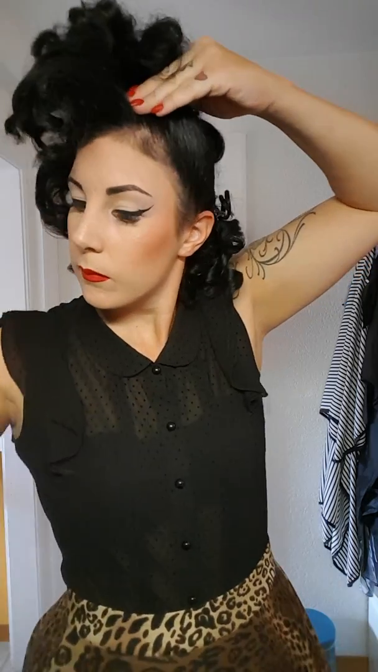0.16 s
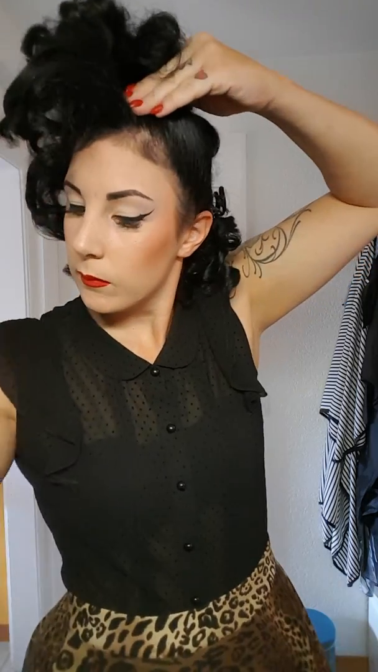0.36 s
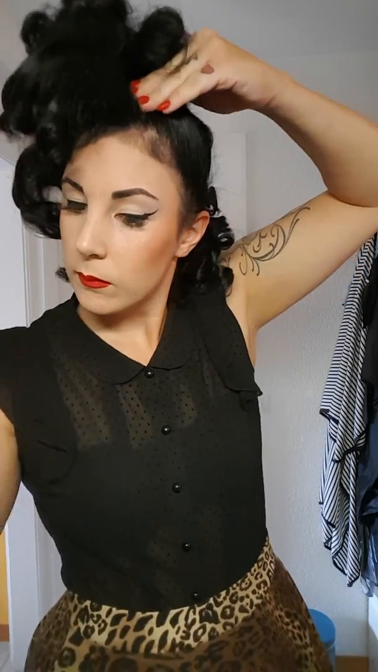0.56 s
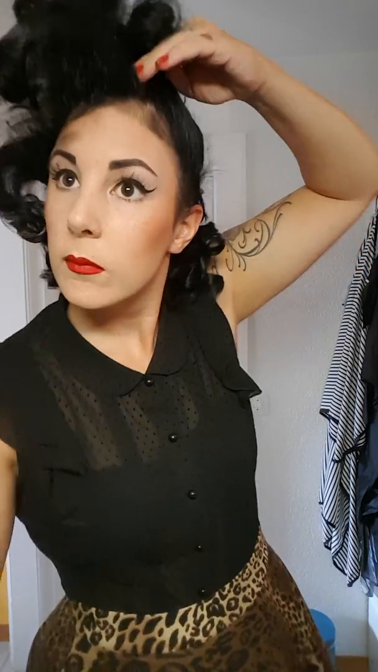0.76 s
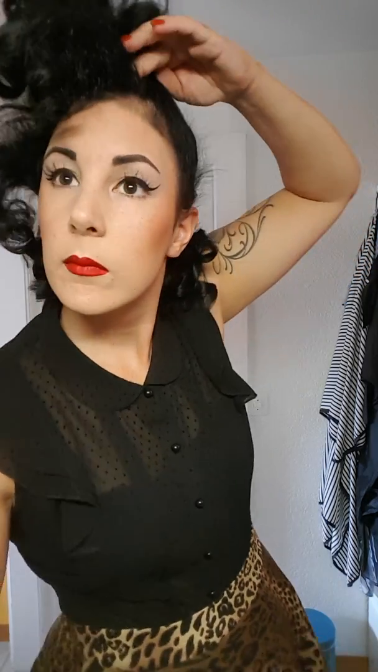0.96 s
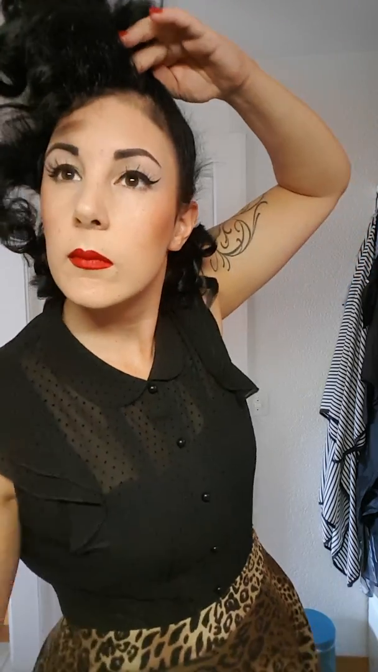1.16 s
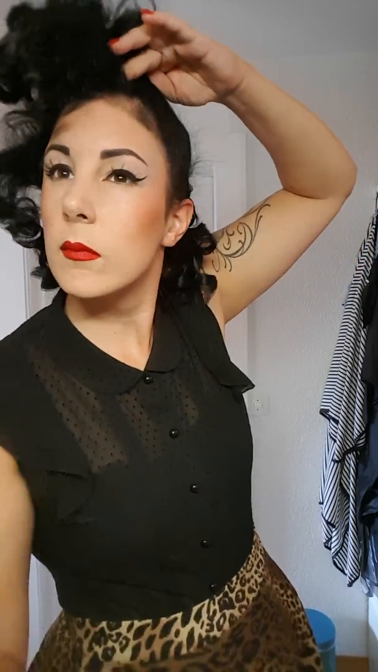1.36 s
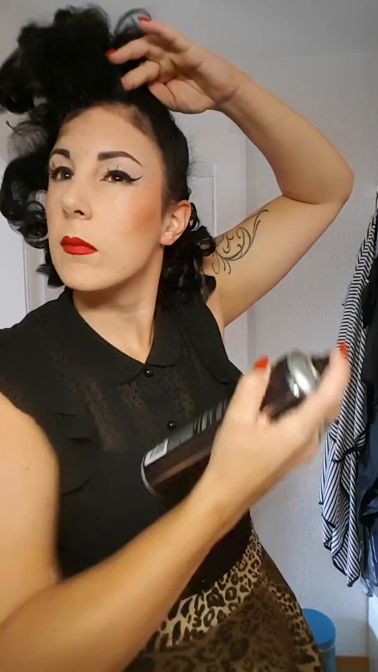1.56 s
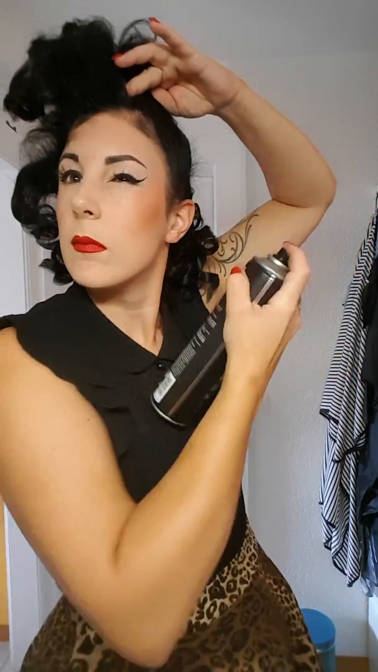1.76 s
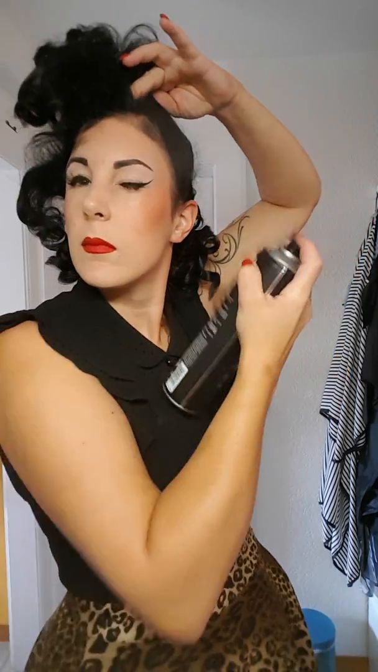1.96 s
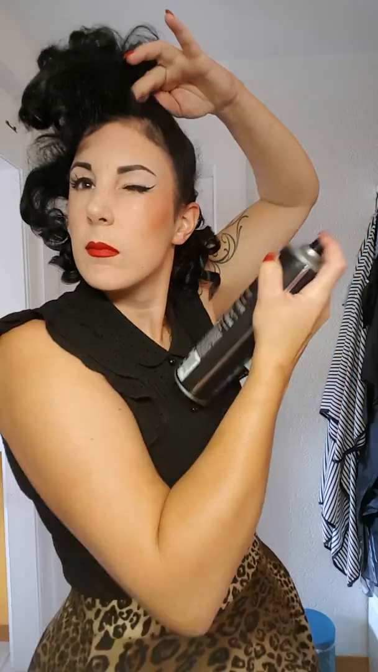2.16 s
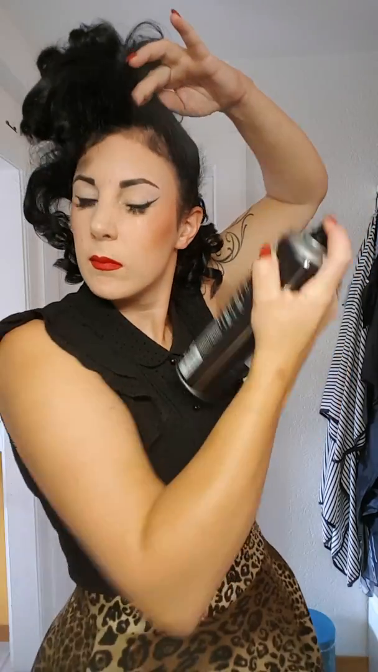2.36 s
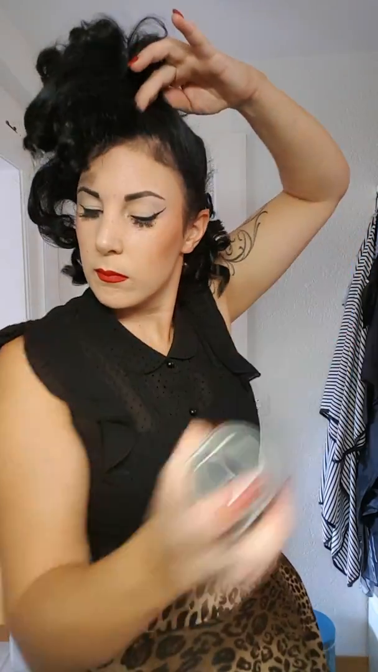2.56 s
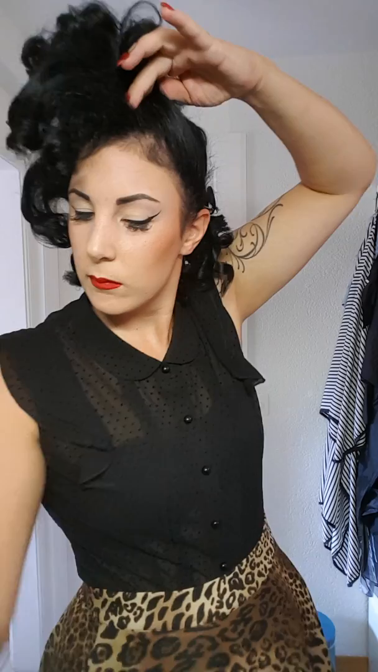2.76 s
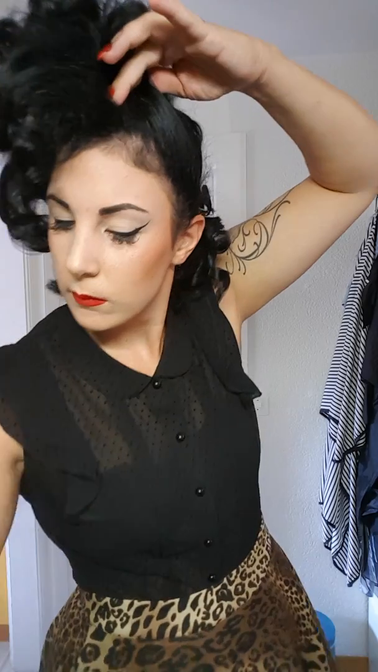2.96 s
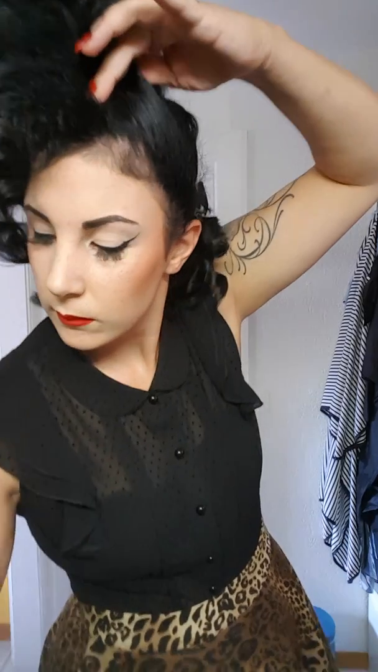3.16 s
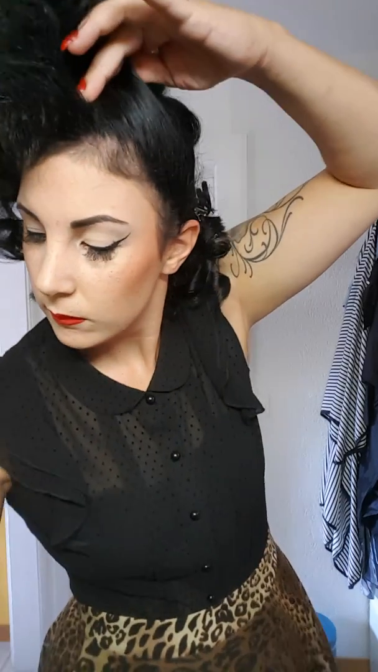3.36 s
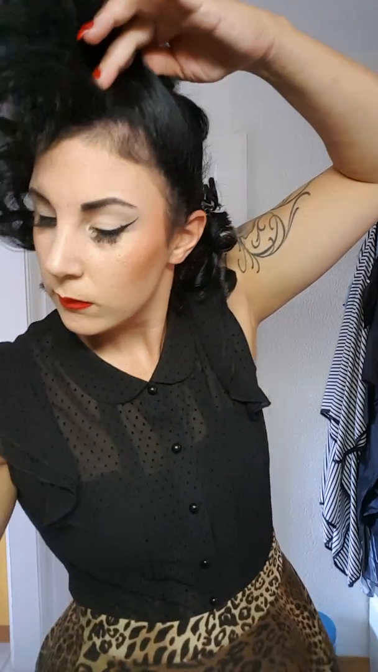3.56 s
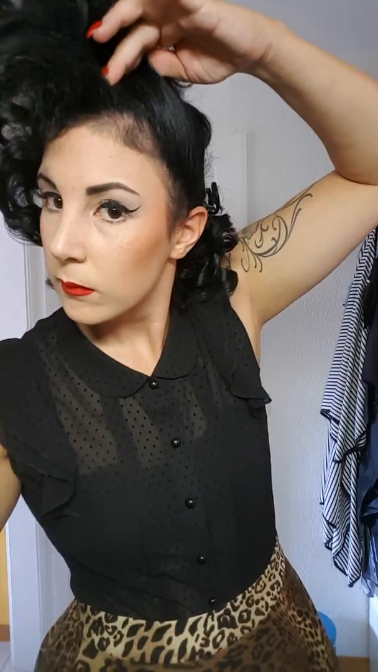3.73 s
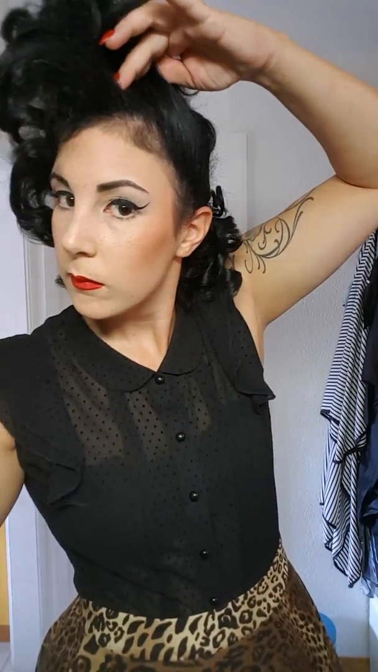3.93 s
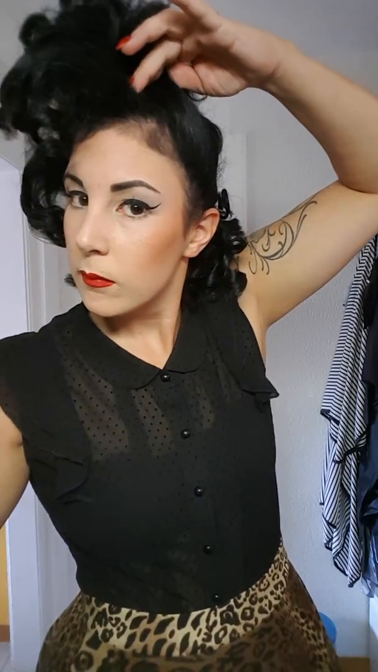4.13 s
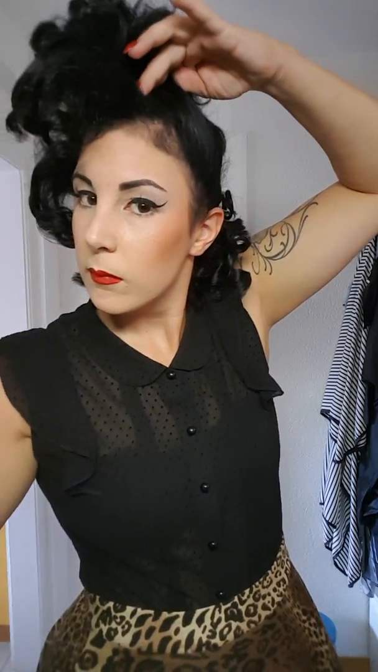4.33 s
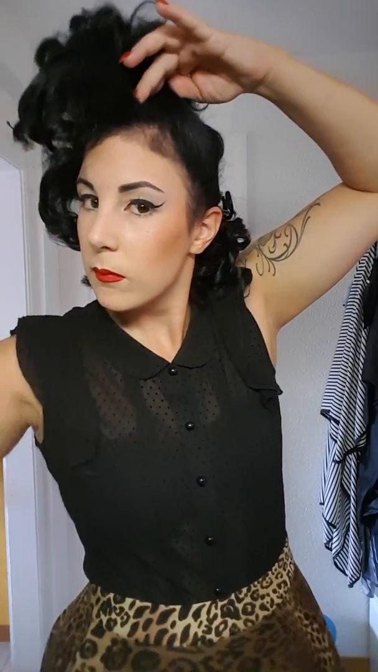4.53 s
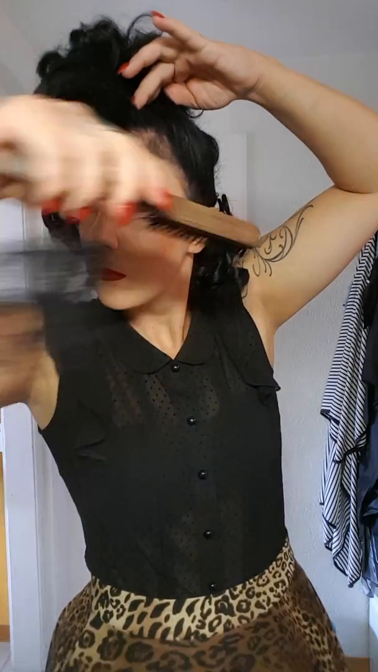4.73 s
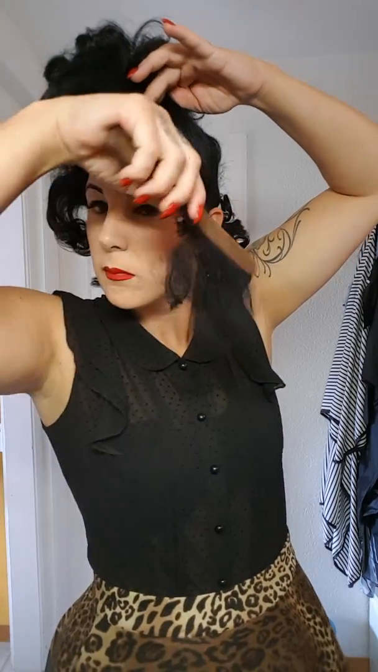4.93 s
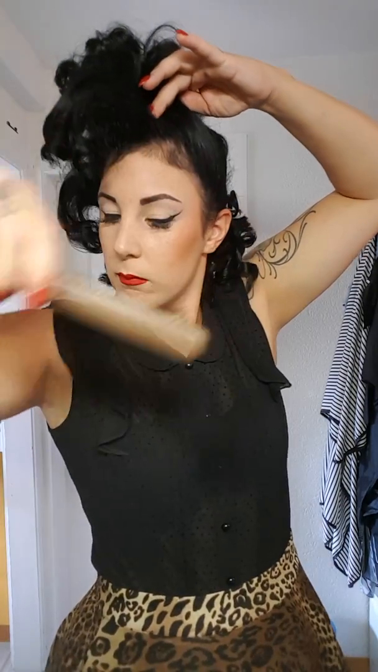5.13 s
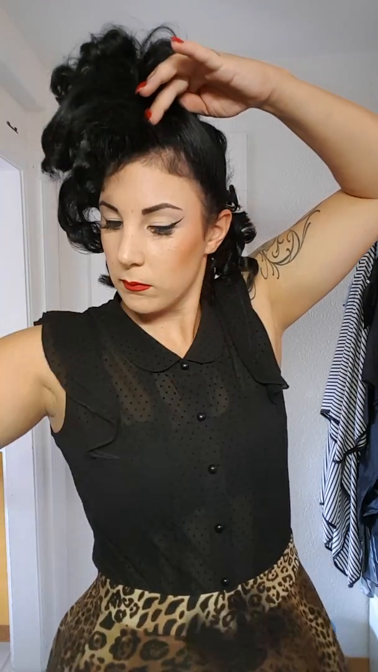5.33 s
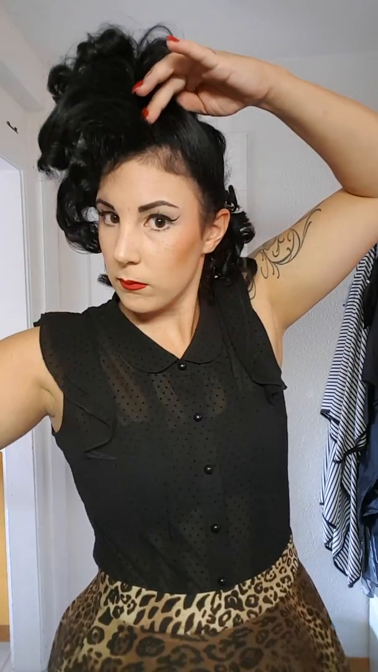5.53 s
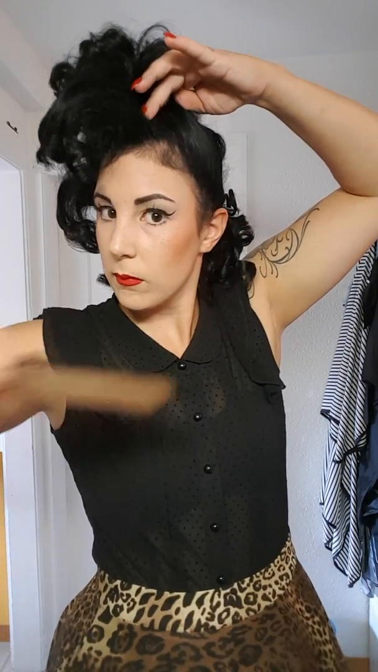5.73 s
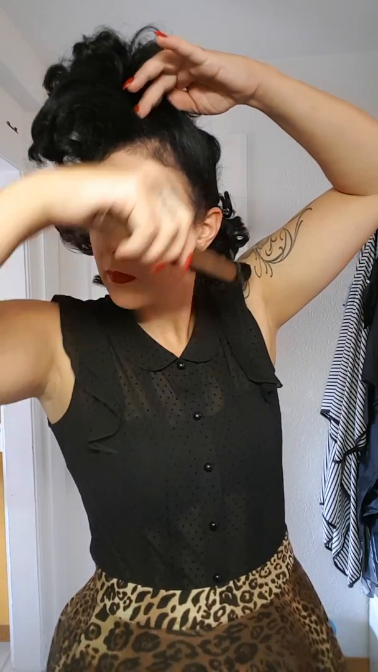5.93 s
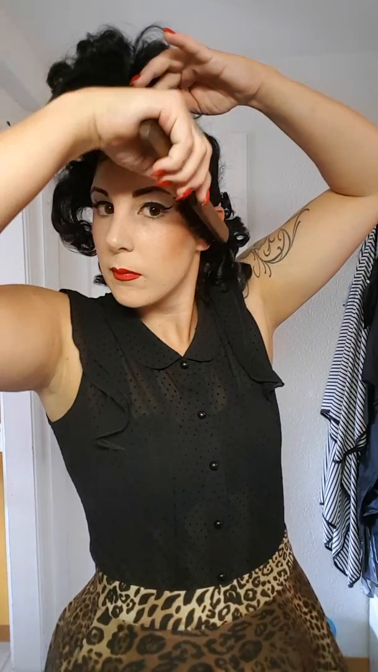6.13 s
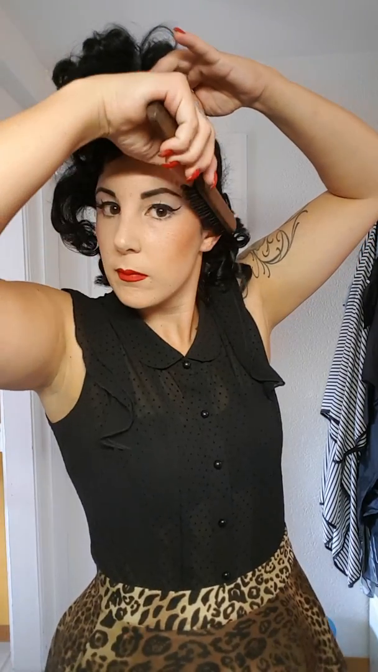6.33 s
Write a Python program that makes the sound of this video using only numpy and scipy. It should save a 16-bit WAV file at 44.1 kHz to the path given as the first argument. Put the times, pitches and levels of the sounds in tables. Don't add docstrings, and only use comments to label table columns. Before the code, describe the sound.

A spray can hisses brightly for half a second, thuds hard onto wood, then a brush is dragged clattering out of a hollow box.

```python
import sys
import numpy as np
from scipy import signal
from scipy.fft import rfft, irfft, next_fast_len
from scipy.io import wavfile
from scipy.ndimage import uniform_filter1d

SR = 44100
rng = np.random.default_rng(int(sys.argv[2]) if len(sys.argv) > 2 else 0)


def digitize_waveform(pressure):
    field = np.atleast_2d(pressure).T
    bounded = np.clip(field, -1, 1)
    quanta = np.round(bounded * 32767).astype(np.int16)
    wavfile.write(sys.argv[1], SR, quanta)


def ratio_of_db(decibels):
    return 10 ** (np.asarray(decibels, float) / 20)


N = 281955
TIME = np.arange(N) / SR

# time_s, level_db
JET = [
    (1.906, -56),
    (1.938, -33),
    (2.018, -30.5),
    (2.166, -34),
    (2.3, -30.5),
    (2.406, -29.5),
    (2.492, -35.5),
    (2.548, -53.5),
    (2.66, -75),
]
# frequency_hz, density_db
JET_COLOUR = [(290, -59), (500, -26), (770, -14.5), (1270, -19), (1800, -9.5), (2510, -8), (2900, -13),
              (3970, -12.5), (5000, -9.5), (7710, -8.5), (9840, 0), (15600, 0)]


def spray():
    (level_db,), on = curves(JET)
    lean_db, swing_db_per_s, turn_s = 3.5, 6, 2.47
    facing = np.clip((turn_s - TIME) / .05 + .5, 0, 1)
    pan_db = (lean_db + swing_db_per_s * (TIME - JET[0][0])) * facing
    direct = rng.standard_normal(N)
    paths = diffuse() + 0.63 * np.array([direct, np.roll(direct, 6)])
    jet = unit(paint(paths, JET_COLOUR)) * ratio_of_db(level_db + 1.8 * walk(25.08)) * on
    treble = band(jet, 5000, 18000)
    leaning = treble * (ratio_of_db(np.array([pan_db, -pan_db]) / 2) - 1)
    spurt_shape = np.exp(-((TIME - 1.965) / 0.031) ** 2)
    spurt = spurt_shape * unit(band(diffuse(), 750, 2400)) * ratio_of_db(-46.0)
    return jet + leaning + spurt


# time_s, blow_db, rim_rattle_db
LANDING = [
    (3.099, -50.5, -86.5),
    (3.161, -47.5, -85.5),
    (3.1785, -3.5, -55),
    (3.184, -1.5, -58.5),
    (3.188, -13, -29),
]
# frequency_hz, level_db, t60_s
SHELF = [(123, -3.5, 0.17), (166.7, -10, 0.083), (263, -12.5, 0.081), (403, -12, 0.11), (456, 3, 0.13),
         (603.4, 1, 0.086), (722, -6, 0.04), (780, 5.5, .05), (900, -7.5, 0.016), (1032, -3, 0.029),
         (1142, -0.5, 0.028), (1340, -11, 0.02), (1658, -3.5, 0.11), (2150, -21.5, 0.046)]
# time_s, peak_db
TICKS = [(1.3054, -44), (1.9091, -52), (2.7891, -56), (3.7045, -26)]
# frequency_hz, level_db, t60_s
TIN = [(2196, 1, 0.035), (3420, 9.5, 0.027), (4660, -48, 0.037), (6860, -13, 0.0081), (7450, 0, 0.025),
       (10200, -13, 0.0092)]
# frequency_hz, level_db, t60_s
SLIDE_RING = [(4120, 1, 0.057), (5270, -1, 0.047), (6600, 0, 0.033), (7550, -1, .03), (8550, 1, 0.027),
              (10500, -6, .02)]


def can():
    s, blow_db, rim_db = np.transpose(LANDING)
    thump = band(ring(blows(s, blow_db - 11.0, 0.045), SHELF), 51, 2050)
    thump = thump + cracks(s, blow_db - 40.5, 4.6, 1600, 5000)
    thump = thump + cracks(s, blow_db - 26.5, 7.3, 250, 1700)
    rim = cracks(s, rim_db + 3, 1.5, 4800, 15000)

    s, tick_db = np.transpose(TICKS)
    tin = ring(blows(s, tick_db - 10.5, 0), TIN) + cracks(s, tick_db - 10.5, 3.8, 970, 4700)
    start_s, end_s, slide_db = 0.83, 1, -68.5
    rub = grains(2700, 2.1) * np.clip(np.minimum(TIME - start_s, end_s - TIME) / .015, 0, 1)
    tin = tin + ring(rub * ratio_of_db(slide_db - 23.5), SLIDE_RING)

    landing = place(thump, 4.0, lag=12, pan_db=-7.5) + place(rim, -4.5, lag=11, pan_db=-4.5)
    return landing + place(tin, -0.37, lag=9)


# time_s, boom_db, body_db, tick_db
KNOCKS = [(3.78, -28, -65, -65), (3.873, -41, -60, -78), (3.937, -30, -35.5, -65), (3.996, -26, -39, -56),
          (4.023, -22, -27, -67), (4.064, -23.5, -42, -69), (4.181, -24.5, -33.5, -53),
          (4.202, -22, -53.5, -65.5), (4.229, -20, -35, -71), (4.264, -23, -36.5, -64),
          (4.282, -24, -70, -52), (4.453, -58, -36, -67), (4.494, -22, -32.5, -82),
          (4.512, -35, -30.5, -41), (4.529, -22.5, -24.5, -34.5), (4.553, -7.5, -20, -21),
          (4.588, -17, -19.5, -22.5), (4.628, -27, -24, -30), (4.654, -28, -29, -40)]
# start_s, hold_s, level_db, boom_share_db, treble_share_db
DRAG = [(3.714, 0.064, -59.5, 5, 11), (3.873, 0.035, -46, 9, -3.5), (3.939, 0.004, -28.5, -0.5, -14),
        (3.994, .001, -42, 5, -8), (4.025, 0.0067, -28, -5, -6), (4.178, 0.014, -31.5, -1.5, -13.5),
        (4.246, 0.012, -44.5, -1, -11.5), (4.399, 0.049, -48.5, 4.5, 0), (4.434, 0.057, -40, 5.5, -15.5),
        (4.517, 0.06, -28, 9, -10), (4.564, 0.032, -33, 6.5, -8), (4.597, 0.021, -36.5, -7, 9.5),
        (4.677, .01, -62, 0, 7)]
# frequency_hz, level_db, t60_s
BOX_BOOM = [(216.7, 3.5, 0.12), (255, -0.5, 0.073), (376.5, -11, 0.1)]
# frequency_hz, level_db, t60_s
BOX_BODY = [(610, 4, 0.02), (828, 6.5, 0.013), (1117, -1.5, 0.029), (1480, 3, 0.026), (2090, -5, 0.018),
            (2655, -14, 0.0125)]


def box():
    s, boom_db, body_db, tick_db = np.transpose(KNOCKS)
    start, hold, level_db, drag_boom_db, drag_top_db = np.transpose(DRAG)
    gains = strokes(start, hold, level_db - 8.0, attack_s=0.0076, fade_db_per_s=184.5)
    contacts = grains(3000, 1.8)
    slide = contacts * gains.sum(axis=0)

    boom_push = blows(s + 0.0023, boom_db - 0.5, 0.39)
    boom = ring(boom_push + contacts * (ratio_of_db(drag_boom_db - 22.5) @ gains), BOX_BOOM)

    body_push = blows(s, body_db - 6.5, 0.04)
    body = ring(body_push + band(slide, 300, 2400) * ratio_of_db(-22), BOX_BODY)
    body = body + cracks(s, body_db - 0.5, 8.9, 450, 1960)
    body = body + band(band(slide, 380, 2420), 300, 2100)

    top = cracks(s, tick_db + 2.5, 2.36, 2300, 12000)
    top = top + band(contacts, 2500, 12000) * (ratio_of_db(drag_top_db - 14.0) @ gains)
    return place(boom, -8.5, lag=7) + place(body + top, -0.26, lag=12, pan_db=-8.0)


# start_s, hold_s, treble_db, lower_share_db
RUSTLE = [(0.803, 0.15, -60, -9), (0.956, .01, -62, 6), (1.03, .12, -70.5, 2), (1.205, 0.068, -64, -26),
          (1.298, 0.001, -49.5, -28), (1.342, 0.027, -56.5, -20), (1.478, 0.035, -62, -15),
          (1.569, .12, -68.5, 1), (1.71, 0.069, -62, -5), (1.856, 0.017, -63, -0.5),
          (2.534, 0.097, -75.5, 10.5), (2.66, 0.095, -65.5, -3), (2.783, .001, -52.5, -23),
          (2.828, 0.034, -60.5, -37), (2.904, 0.09, -66, -2.5), (3.013, 0.071, -65.5, 0),
          (3.242, 0.037, -62.5, 2.5), (3.329, 0.037, -63, -2), (3.41, .002, -61, -3), (3.47, .1, -75, 0),
          (4.256, 0.0039, -62, 6), (4.319, 0.035, -56, -4), (4.425, .015, -58.5, 6.5)]


def rustle():
    fibres = diffuse() + 0.13 * grains(4000, 3.0)
    airy = unit(band(fibres, 4000, 23000))
    dull = unit(band(fibres, 1400, 4500))
    start, hold, level_db, dull_db = np.transpose(RUSTLE)
    gains = strokes(start, hold, level_db, attack_s=.007, fade_db_per_s=279)
    return ratio_of_db(1.5 * walk(34)) * (gains.sum(axis=0) * airy + ratio_of_db(dull_db) @ gains * dull)


# start_s, hold_s, slip_rate_hz, level_db
CREAKS = [
    (4.81, 0.061, 203.2, -54.5),
    (4.87, 0.043, 194.9, -49),
    (4.914, 0.16, 194.8, -53.5),
    (5.08, 0.11, 196.4, -59),
    (5.566, .02, 325, -46.5),
]
# multiple, level_db
CREAK_ORDERS = [(1, 0), (2, -11.5), (3, -27), (4, -26.5)]


def creaks():
    start, hold, rate_hz, level_db = np.transpose(CREAKS)
    gains = strokes(start, hold, level_db, attack_s=.012, fade_db_per_s=597)
    slip_hz = rate_hz[gains.argmax(axis=0)]
    phase = 2 * np.pi * np.cumsum(slip_hz * (1 + 0.00966 * walk(54))) / SR
    harmonics = sum(ratio_of_db(db + 3.2 * walk(30)) * np.sin(k * phase) for k, db in CREAK_ORDERS)
    return place(gains.max(axis=0) * np.sqrt(2) * harmonics, -8, lag=8)


# time_s, level_db
RUMBLE = [(0, -43.5), (.3, -55), (.59, -56), (.69, -46.5), (.9, -51), (1.7, -57.5), (2.45, -55.5),
          (2.6, -54.5), (2.87, -54), (3.1, -50), (3.5, -52), (4.3, -58.5), (4.5, -70), (4.84, -59),
          (5.3, -61), (5.7, -60), (6.23, -64), (6.39, -50.5)]
# start_s, hold_s, deep_db, hum_db, drone_db
SHUDDERS = [(0.307, .3, -67, -64.5, -72), (1.73, .4, -65, -77, -66.5), (2.2, .28, -63.5, -61, -65),
            (3.145, .1, -41.5, -66, -45), (3.68, .08, -68, -59.5, -50), (3.979, .1, -75.5, -58, -48.5),
            (4.399, .08, -82.5, -69, -56.5), (4.633, .06, -84, -82, -57.5), (5.096, .4, -79, -69.5, -84),
            (5.8, .1, -54, -64, -72)]
# frequency_hz, width_hz, level_db
DRONE = [
    [(50.67, 4, -4), (60, 33, -6.5), (33.4, 11, -9)],
    [(97, 11, 0.5)],
    [(198, 44, -3), (212.6, 93, 3), (310, 130, -5.5)],
]
STEADY_DB = [-65, -64.5]


def traffic():
    (deep_db,), _ = curves(RUMBLE)
    start, hold, *extra_db = np.transpose(SHUDDERS)
    shape = strokes(start, hold, 0 * hold, attack_s=0.029, fade_db_per_s=112.5)
    source, out = diffuse(), 0
    for level_db, shudder_db, peaks in zip([deep_db, *STEADY_DB], extra_db, DRONE):
        hum = 0
        for hz, width_hz, db in peaks:
            resonance = unit(band(source, hz - width_hz / 2, hz + width_hz / 2))
            hum = hum + ratio_of_db(db + 1.8 * walk(3.5)) * resonance
        out = out + unit(hum) * (ratio_of_db(level_db) + ratio_of_db(shudder_db) @ shape)
    return out


# start_s, end_s, centre_hz, width_hz
WHINES = [(-.1, .3, 385, 50), (0, .9, 61, 3), (.945, 1.01, 550, 500), (.945, 1.04, 2600, 3600),
          (1.14, 1.42, 2780, 150), (1.2, 1.42, 3600, 150), (1.25, 1.8, 1125, 15), (1.47, 1.57, 2700, 200),
          (1.65, 1.78, 1500, 400), (1.77, 1.87, 1510, 90), (2.33, 2.56, 340, 25), (3.35, 3.7, 590, 15),
          (4.3, 4.42, 3900, 1800), (4.43, 4.48, 12500, 6000), (4.7, 6.5, 12800, 15), (5.15, 5.6, 515, 15),
          (5.85, 5.95, 250, 150), (5.95, 6.5, 1775, 12), (6.15, 6.5, 1225, 20)]
WHINES_DB = [-66, -54.5, -52, -57.5, -74, -70, -71.5, -67, -65, -59, -58.5, -67.5, -55, -49.5, -90, -78,
             -57.5, -75, -68]


def whines():
    source, out = diffuse(), 0
    for (start, end, hz, width_hz), level_db in zip(WHINES, WHINES_DB):
        swell = np.clip(np.minimum(TIME - start, end - TIME) / 0.027, 0, 1)
        tone = unit(band(source, hz - width_hz / 2, hz + width_hz / 2))
        out = out + swell * ratio_of_db(level_db + 2.0 * walk(15)) * tone
    return out


# frequency_hz, density_db
AIR = [(88, -31.5), (150, -5.5), (201, -3.5), (466, -15.5), (821, -14.5), (1020, -12.5), (1140, -14.5),
       (2870, -22.5), (3490, -25.5), (6510, -33), (9820, -36.5), (15100, -28), (16000, -34)]


def air():
    return unit(paint(diffuse(), AIR)) * ratio_of_db(-63 + 0.84 * walk(4.1))


# frequency_hz, t60_s
ROOM_T60 = [(100, 0.3), (500, 0.26), (2000, 0.29), (6000, 0.22), (12000, 0.081)]


def place(x, wet_db, lag=0, pan_db=0.):
    tail, t, echo = diffuse(SR // 2), np.arange(SR // 2) / SR, 0
    room_hz, room_t60 = np.transpose(ROOM_T60)
    for hz in 70 * 2. ** np.arange(8):
        t60 = np.interp(np.log(hz), np.log(room_hz), room_t60)
        top_hz = hz * np.sqrt(2) * (1 + (hz > 8000))
        echo = echo + band(tail, hz / np.sqrt(2), top_hz) * ratio_of_db(-60 * t / t60)
    echo = echo * np.clip(t / 0.0016, 0, 1) / np.sqrt(np.sum(echo ** 2) / 2)
    direct = np.array([np.roll(x, lag) * ratio_of_db(pan_db / 2), x * ratio_of_db(-pan_db / 2)])
    return direct + ratio_of_db(wet_db) * signal.fftconvolve(x[None], echo, axes=1)[:, :N]


def diffuse(length=N):
    port_gap_m, sound_m_per_s = 0.16, 343
    size = next_fast_len(length)
    hz = np.arange(size // 2 + 1) * SR / size
    alike = .92 * np.sinc(2 * hz * port_gap_m / sound_m_per_s)
    mid, side = rfft(rng.standard_normal((2, size))) * np.sqrt([1 + alike, 1 - alike])
    return irfft([mid + side, mid - side], size)[:, :length] / np.sqrt(2)


def blows(s, db, push_ms):
    x = np.zeros(N)
    x[(np.asarray(s) * SR).astype(int)] = ratio_of_db(db)
    keep = np.exp(-1000 / (push_ms * SR + 1))
    return signal.lfilter([(1 - keep) ** 2], [1, -2 * keep, keep ** 2], x)


def ring(x, modes):
    out = 0
    for hz, db, t60 in modes:
        turn = 2 * np.pi * hz / SR
        keep = np.exp(-np.log(1000) / (t60 * SR))
        poles = [1, -2 * keep * np.cos(turn), keep ** 2]
        out = out - ratio_of_db(db) * signal.lfilter([0, keep * np.sin(turn)], poles, x)
    return band(out, 1.186 * modes[0][0], SR)


def cracks(s, db, decay_ms, lo_hz, hi_hz):
    envelope = signal.lfilter([1], [1, -np.exp(-1000 / (decay_ms * SR))], blows(s, db, 0))
    return envelope * unit(band(rng.standard_normal(N), lo_hz, hi_hz))


def grains(per_s, spread_db):
    hits = rng.random(N) < per_s / SR
    return unit(hits * rng.standard_normal(N) * ratio_of_db(spread_db * rng.exponential(size=N)))


def strokes(start, hold, db, attack_s, fade_db_per_s):
    t = TIME - np.array(start)[:, None]
    late = np.maximum(t - attack_s - np.abs(hold)[:, None], 0)
    return np.clip(t / attack_s, 0, 1) ** 2 * ratio_of_db(np.array(db)[:, None] - fade_db_per_s * late)


def walk(rate_hz):
    k = int(SR / rate_hz)
    held = np.repeat(rng.standard_normal(N // k + 1), k)
    return 1.3 * uniform_filter1d(uniform_filter1d(held, k), k)[:N]


def curves(rows):
    s, *columns = np.transpose(rows)
    on = np.interp(TIME, [s[0] - .01, s[0], s[-1], s[-1] + .01], [0, 1, 1, 0])
    return [np.interp(TIME, s, c) for c in columns], on


def paint(x, colour):
    hz, db = np.transpose(colour)
    size = next_fast_len(N)
    bins = np.arange(size // 2 + 1) * SR / size + 1
    gain = ratio_of_db(np.interp(np.log(bins), np.log(hz), db))
    return irfft(rfft(x, size) * gain, size)[:, :N]


def band(x, lo_hz, hi_hz):
    edges_hz = [lo_hz, min(hi_hz, .45 * SR)]
    return signal.sosfilt(signal.butter(2, edges_hz, "band", fs=SR, output="sos"), x)


def unit(x):
    return x / np.sqrt(np.mean(x ** 2))


def scene():
    return spray() + can() + box() + rustle() + creaks() + traffic() + whines() + air()


def top_cut(x):
    return signal.sosfilt(signal.butter(12, 16980, fs=SR, output="sos"), x)


def record(dry):
    low_pass = signal.ellip(10, .2, 60, 15750, fs=SR, output="sos")
    mix = signal.sosfilt(low_pass, np.tanh(dry))
    return top_cut(mix)


dry = scene()
out = record(dry)
digitize_waveform(out)
```